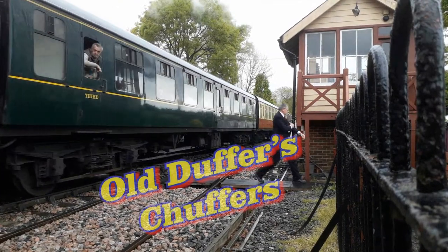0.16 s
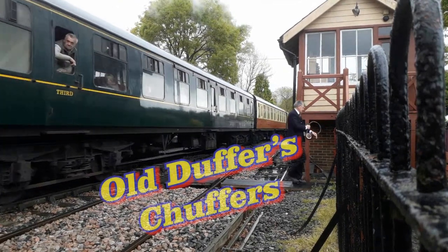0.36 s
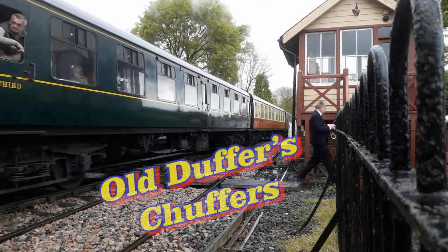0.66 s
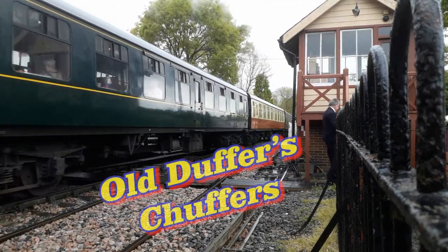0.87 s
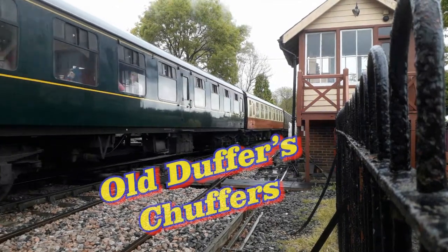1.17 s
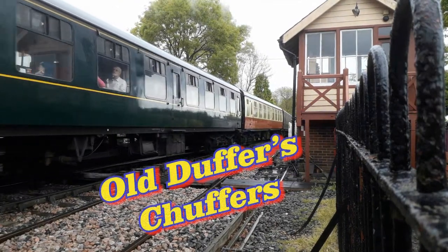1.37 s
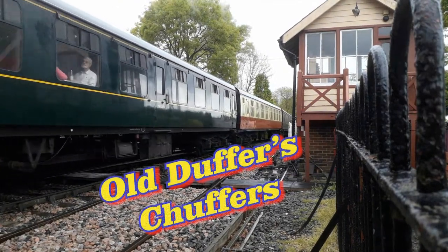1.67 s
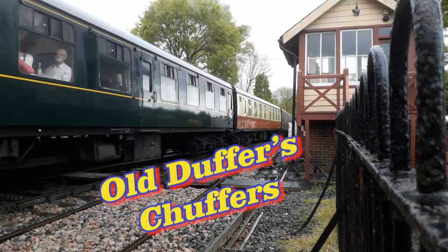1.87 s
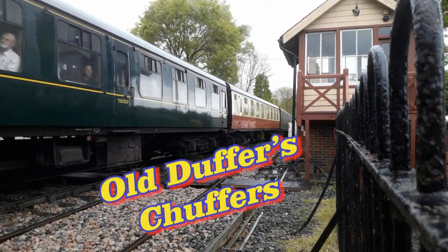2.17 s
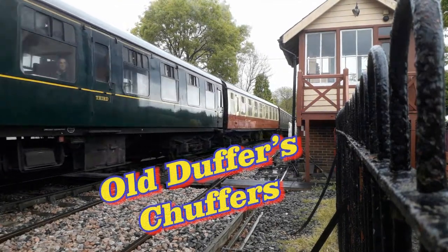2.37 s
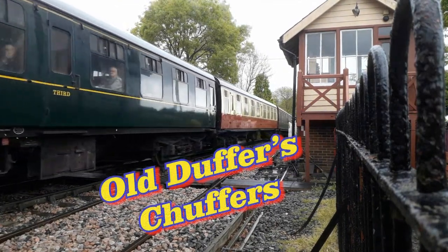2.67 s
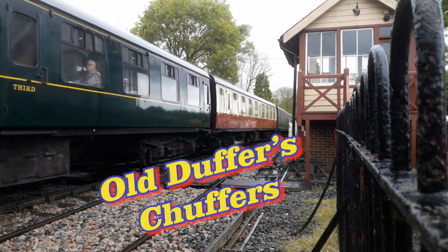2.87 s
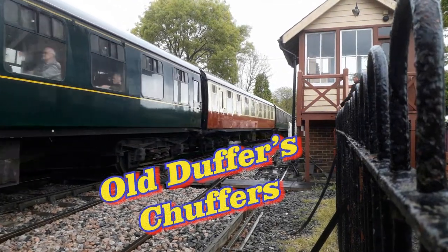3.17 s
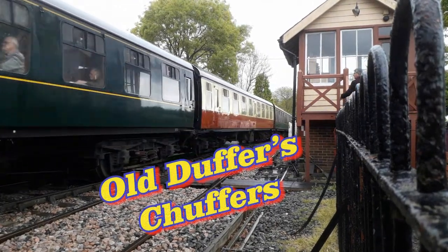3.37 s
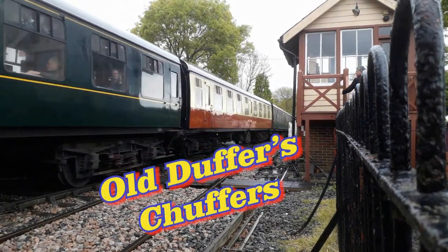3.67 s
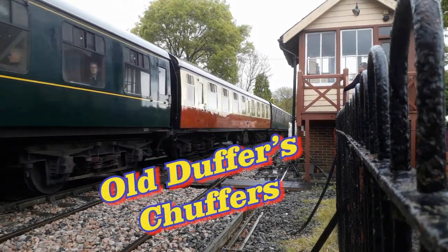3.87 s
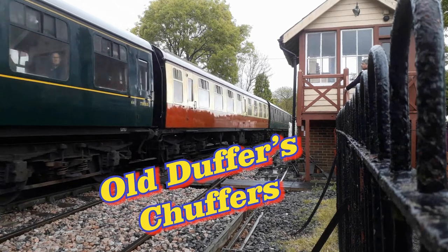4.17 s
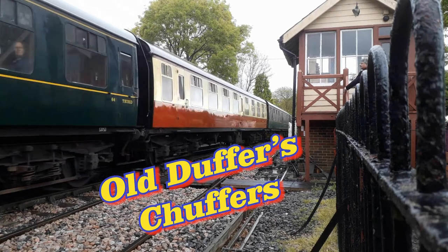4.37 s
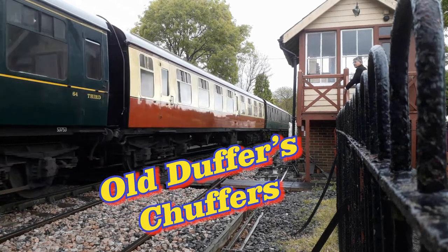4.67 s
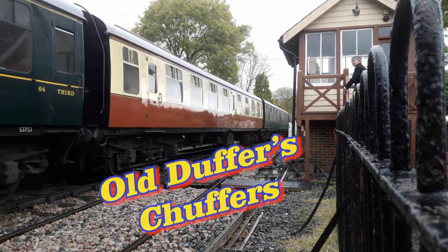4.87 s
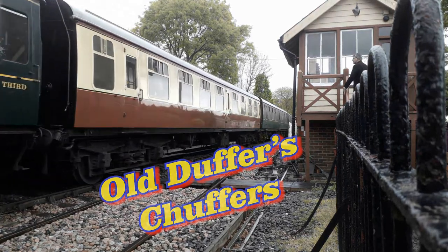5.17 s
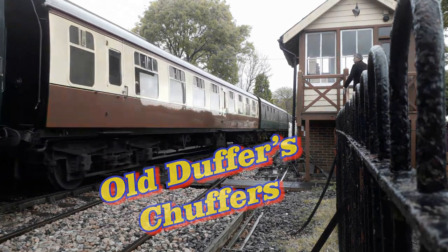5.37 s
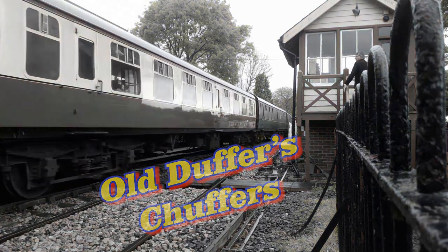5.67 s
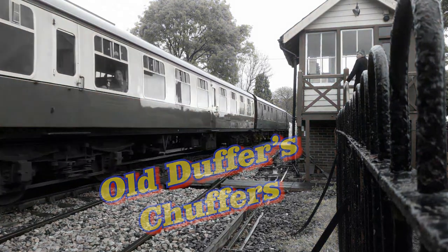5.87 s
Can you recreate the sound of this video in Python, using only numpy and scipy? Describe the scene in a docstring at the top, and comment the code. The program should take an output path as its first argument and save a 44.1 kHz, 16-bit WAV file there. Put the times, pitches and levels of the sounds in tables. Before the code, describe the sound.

Close to a railway track outdoors, a steam engine pulls away with hoarse, booming chuffs nearly four times a second. Leaking steam hisses steadily, fading, with two brief wheezes. Coaches rumble quietly past with a few dull knocks. The chuffs grow weaker with distance, then quicken in the last second as wheels slip. A fixed lineside microphone hears everything centred, with a short dull echo.

```python
"""At a lineside fence, a steam locomotive works away down the line while its coaches roll slowly past.
Each exhaust beat is shaped noise: a turbulent roar and rasp, a chimney boom just behind, a sizzle and spray last;
the beats weaken as the engine recedes, and coach sides and buildings throw them back as a short, dull echo.
Leaking steam is a wavering, fading hiss with two short wheezes near 3 kHz, then a slow, broad brightening
near 5 kHz; filtered noise makes the coaches' rumble and knocks."""
import sys
import numpy as np
from scipy import signal
from scipy.fft import rfft, irfft
from scipy.io import wavfile
from scipy.ndimage import map_coordinates

SR = 44100
rng = np.random.default_rng(int(sys.argv[2]) if len(sys.argv) > 2 else 0)


def int16_out(signal):
    """Quantize to a 16-bit WAV file."""
    q = np.round(np.clip(np.atleast_2d(signal).T, -1, 1) * 32767)
    wavfile.write(sys.argv[1], SR, q.astype(np.int16))


N = 265923
TIME = np.arange(N) / SR  # s
FREQ = np.maximum(np.arange(N // 2 + 1) * SR / N, 1)  # Hz

# exhaust beats, quickening at the end as the wheels slip: start t/s, strength level/dB
EXHAUST_BEATS = [(0.056, 0), (0.336, 1.3), (0.626, 0.3), (0.895, 1), (1.175, 2.1), (1.455, 3), (1.735, 0.9),
                 (2.001, 0.3), (2.276, 0.2), (2.549, 3), (2.829, 2.5), (3.088, 2), (3.363, 1.3),
                 (3.633, 0.8), (3.91, -2.5), (4.158, -3.5), (4.428, -3), (4.69, -0.7), (4.958, 0.9),
                 (5.202, 0.7), (5.409, 1.7), (5.576, 2), (5.741, -0.3)]


def undb(db):
    """Decibels to gain."""
    return 10 ** (np.asarray(db) / 20)


def unit(x):
    """Scale to rms 1."""
    return x / np.sqrt(np.mean(x ** 2))


def colour(x, points):
    """Shape x with a spectrum of (f/Hz, level/dB) points, joined on a log frequency axis, at rms 1."""
    hz, db = np.transpose(points)
    gain = undb(np.interp(np.log(FREQ), np.log(hz), db))
    return unit(irfft(rfft(x) * gain, N))


def resonate(x, modes):
    """Ring parallel resonances of (f/Hz, width/Hz, level/dB) with x."""
    response = 0
    for hz, width, db in modes:
        response = response + undb(db) / (1 + 1j * (FREQ ** 2 - hz ** 2) / (FREQ * width))
    return irfft(rfft(x) * response, N)


def walk(rate):
    """Random wander with about `rate` turns a second and rms 1: straight lines between chance values."""
    steps = TIME * rate * 2
    return unit(map_coordinates(rng.standard_normal(N // 20), [steps], order=1, mode="wrap"))


def turbulence(eddy_db, eddy_rate):
    """Noise that comes in eddies: its level wanders by eddy_db, about eddy_rate times a second."""
    return unit(rng.standard_normal(N) * undb(eddy_db * walk(eddy_rate)))


def rolling():
    """Strength of the rumble: steady from the whole train, swelling as each bogie goes by."""
    # bogies rolling by: middle t/s, level/dB
    passes = [(0.9, -42), (3.75, -43), (5.55, -37.5)]
    steady_db, half_length_s = -42.5, 0.36
    power = undb(steady_db) ** 2
    for middle, db in passes:
        swell = undb(db) * np.exp(-((TIME - middle) / half_length_s) ** 2 / 2)
        power = power + swell ** 2
    return np.sqrt(power)


def coaches():
    """Wheels rumble over rough rail; now and then slack gear knocks against a bogie and rings it."""
    # rumble spectrum: f/Hz, density level/dB per Hz
    rumble_spectrum = [(20, -49), (40, -34), (85, -4.5), (150, 2.5), (245, 5), (350, -11.5), (480, -4),
                       (900, -13.5), (1400, -13.5), (3000, -24), (8000, -34.5)]
    # knocks of the running gear: start t/s, level/dB before the trim
    knocks = [(1.092, -31.5), (3.607, -35), (3.862, -37.5), (4.131, -31.5), (5.945, -37)]
    # bogie resonances: f/Hz, width/Hz, level/dB
    bogie_modes = [(248, 41, 8), (500, 75, 2), (880, 360, -5), (1260, 210, -9), (3300, 1200, -47)]
    rise_s, fall_s, trim_db = .003, .024, -0.5
    rumble = colour(turbulence(eddy_db=1.5, eddy_rate=25), rumble_spectrum) * rolling()
    blows = np.zeros(N)
    for start, db in knocks:
        age = np.maximum(TIME - start, 0)
        blows += undb(db + trim_db) * (1 - np.exp(-age / rise_s)) * np.exp(-age / fall_s)
    ring = unit(resonate(rng.standard_normal(N), bogie_modes))
    return rumble + blows * ring


def leak():
    """Steam escapes round the cylinders in a slowly wavering, fading hiss with swells of narrower noise."""
    # hiss spectrum: f/Hz, density level/dB per Hz
    hiss_spectrum = [(700, 4.5), (1500, 4.5), (3800, 5.5), (7500, -3), (9200, 0.5), (11500, 1.5),
                     (15500, -9)]
    # two short wheezes near 3 kHz, then a slow, broad brightening of the hiss near 5 kHz:
    # middle t/s, half length/s, f/Hz, width/Hz, level/dB
    hiss_swells = [(2.12, 0.057, 3060, 260, -37.5), (2.384, 0.075, 3030, 220, -47),
                   (3.1, 0.87, 4870, 1200, -52)]
    start_db, fade_db_per_s = -36, 2.5
    level_db = start_db - fade_db_per_s * TIME + 0.46 * walk(4.4)
    steam = colour(turbulence(eddy_db=0.8, eddy_rate=380), hiss_spectrum) * undb(level_db)
    for middle, half_length, hz, width, db in hiss_swells:
        swell = np.exp(-((TIME - middle) / half_length) ** 2)
        band = unit(resonate(rng.standard_normal(N), [(hz, width, 0)]))
        steam = steam + undb(db) * swell * band
    return steam


def distance(t):
    """Distance of the engine as a multiple of where it starts; it leaves at a steady speed."""
    doubling_s = 2.76
    return 1 + t / doubling_s


def beat_levels(db, follow, falloff, close_db):
    """Level of one exhaust layer per beat: follows the strength, falls with distance, differs close by."""
    close_s = 0.5  # the nearby engine's different balance fades with this time constant
    start, strength = np.transpose(EXHAUST_BEATS)
    distance_loss_db = falloff * 20 * np.log10(distance(start))
    return db + follow * strength - distance_loss_db + close_db * np.exp(-start / close_s)


def blasts(levels_db, delay, stretch, rise, fall):
    """Steam flow: each beat swells as the valve opens and dies as the cylinder empties."""
    swell_s = .062  # from the valve opening to full blast, at stretch 1
    power = np.zeros(N)
    for (start, _), db in zip(EXHAUST_BEATS, levels_db):
        span = (TIME > start + delay) & (TIME < start + .5)
        age = (TIME[span] - start - delay) / (swell_s * stretch)
        envelope = age ** rise * np.exp((1 - age ** fall) * rise / fall)  # peaks at 1 when age is 1
        power[span] += (undb(db) * envelope) ** 2
    return np.sqrt(power)


def restless(modes, eddy_db, wander_db):
    """Turbulence rings each resonance on its own, so now one, now another stands out."""
    total = 0
    for mode in modes:
        ring = resonate(turbulence(eddy_db, eddy_rate=290), [mode])
        total = total + ring * undb(wander_db * walk(6.7))
    return unit(total)


def exhaust():
    """The blast roars and rasps in the stack, the chimney booms just after, the jet sizzles and sprays."""
    # layer spectra: f/Hz, density level/dB per Hz
    roar_spectrum, rasp_spectrum = [(35, -49), (85, -8), (150, 2.5), (320, 1), (490, -5), (680, 0),
                                    (900, -3.5), (1300, -18), (2200, -52)], [(600, -24), (980, -2), (1500, 4.5), (2100, -1),
                                                  (2600, -11.5), (3600, -28)]
    sizzle_spectrum, spray_spectrum = [(1200, -9.5), (2300, 0.5), (3100, 3.5), (5000, -3), (7500, -13.5),
                                       (11000, -14.5), (15500, -30)], [(2500, -34), (5000, -1), (7500, -1.5), (10500, -0.5),
                                                       (13000, -2.5), (15500, -14)]
    # resonances of the stack, round the blast pipe, of chimney and smokebox: f/Hz, width/Hz, level/dB
    throat_modes, blast_pipe_modes, chimney_modes = [(500, 80, 2.5), (575, 33, -1.5), (823, 33, 1)], [(1096, 51, 7.5), (1266, 170, -1),
                                                                     (1470, 77, -2.5), (1596, 110, -0.5),
                                                                     (1770, 145, -7)], [(188, 12.5, -3.5),
                                                                                         (241.9, 23, 4),
                                                                                         (260.3, 21, -2),
                                                                                         (321.4, 21, -4)]

    roar_db = beat_levels(db=-27.85, follow=1.0, falloff=1.0, close_db=3.0)
    rasp_db = beat_levels(db=-30.5, follow=1.0, falloff=1.0, close_db=-4.5)
    boom_db = beat_levels(db=-20.5, follow=0.35, falloff=1.31, close_db=4.0)
    sizzle_db = beat_levels(db=-36.5, follow=0.91, falloff=0.51, close_db=4.5)
    spray_db = beat_levels(db=-38.5, follow=0.68, falloff=1.37, close_db=-8)

    roar = colour(turbulence(eddy_db=1.5, eddy_rate=170), roar_spectrum)
    roar = roar + undb(-4) * restless(throat_modes, eddy_db=1.5, wander_db=1.5)
    roar = roar * blasts(roar_db, delay=0.0014, stretch=0.95, rise=0.84, fall=1.7)

    rasp = colour(turbulence(eddy_db=1.5, eddy_rate=260), rasp_spectrum)
    rasp = rasp + undb(-2.5) * restless(blast_pipe_modes, eddy_db=2, wander_db=2.0)
    rasp = rasp * blasts(rasp_db, delay=0.0014, stretch=0.9, rise=0.87, fall=1.61)

    column = unit(resonate(rng.standard_normal(N), chimney_modes))
    # the jet feeds the air column steadily, so its swing stays fairly even
    column = unit(column / np.abs(signal.hilbert(column)) ** 0.35)
    boom = column * blasts(boom_db, delay=0.0091, stretch=1.096, rise=0.98, fall=1.706)

    sizzle = colour(turbulence(eddy_db=1.0, eddy_rate=910), sizzle_spectrum)
    sizzle = sizzle * blasts(sizzle_db, delay=0, stretch=1.276, rise=0.89, fall=2.14)

    spray = colour(rng.standard_normal(N), spray_spectrum)
    spray = spray * blasts(spray_db, delay=.02, stretch=1.39, rise=1.6, fall=2.2)

    flutter = undb(0.66 * walk(41))  # roar, rasp and boom flap together
    return flutter * (roar + rasp + boom) + sizzle + spray


def ground(x, share, top_hz):
    """The ground mirrors the chimney; as the engine recedes the detour shrinks and the comb sweeps up."""
    near_s, shortest_s = .0044, .0021  # detour at the start, and where it stops shrinking
    dull = signal.sosfiltfilt(signal.butter(1, top_hz, fs=SR, output="sos"), x)  # ballast scatters the treble
    detour = np.maximum(near_s / distance(TIME), shortest_s)
    return x + share * np.interp(TIME - detour, TIME, dull)


def lineside(x, echo_db, t60):
    """Coach sides and buildings scatter a short, dull echo: decaying noise, from 20 ms on."""
    scatter = rng.standard_normal(N) * undb(-60 * TIME / t60) * (TIME > .02)
    scatter = scatter / np.sqrt(np.sum(scatter ** 2))
    scatter = signal.sosfilt(signal.butter(1, 2500, fs=SR, output="sos"), scatter)
    return x + undb(echo_db) * signal.fftconvolve(x, scatter)[:N]


def air(x, top_hz, loss_db_per_s):
    """The air swallows more of the highest hiss as the engine draws away; halfway through it is neutral."""
    body = signal.sosfiltfilt(signal.butter(2, top_hz, fs=SR, output="sos"), x)
    treble = x - body
    return body + treble * undb(-loss_db_per_s * (TIME - TIME.mean()))


def scene():
    """Engine and coaches, the same in both ears."""
    rolling_stock = coaches()
    steam = leak()
    engine = lineside(ground(exhaust(), share=0.27, top_hz=2500), echo_db=-12, t60=0.46)
    sound = air(engine + steam, top_hz=11000, loss_db_per_s=0.7) + rolling_stock
    return np.array([sound, sound])


def record(dry):
    """The recorder cuts the deepest rumble below 52 Hz and, steeply, the top above 15.72 kHz."""
    thin = signal.sosfilt(signal.butter(3, 52, "high", fs=SR, output="sos"), dry)
    return signal.sosfilt(signal.ellip(10, .2, 80, 15720, fs=SR, output="sos"), thin)


dry = scene()
out = record(dry)
int16_out(out)
```